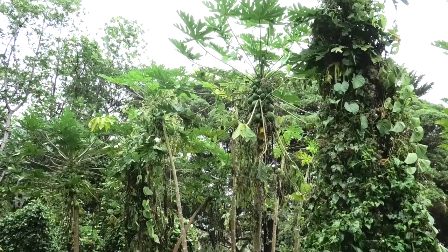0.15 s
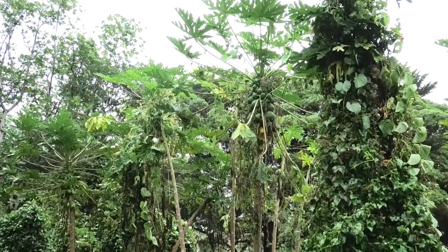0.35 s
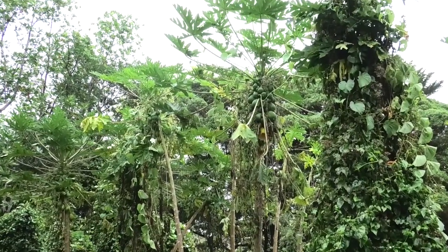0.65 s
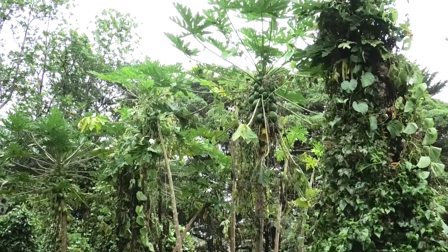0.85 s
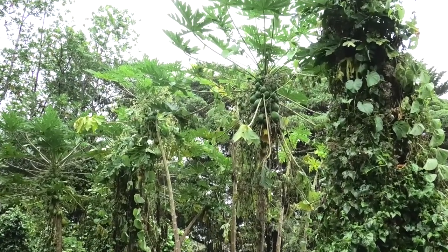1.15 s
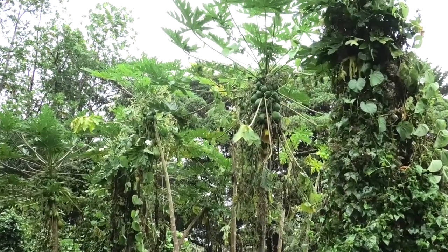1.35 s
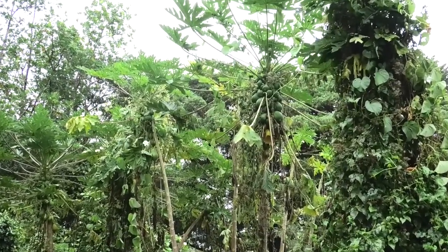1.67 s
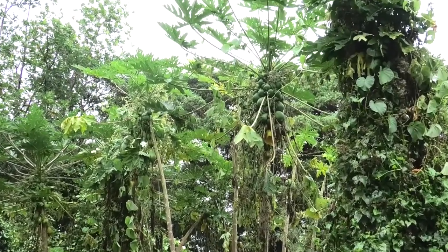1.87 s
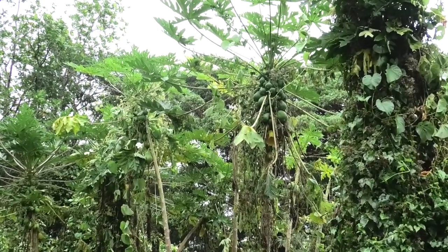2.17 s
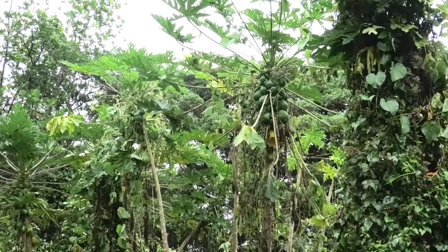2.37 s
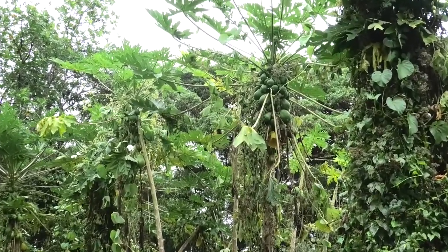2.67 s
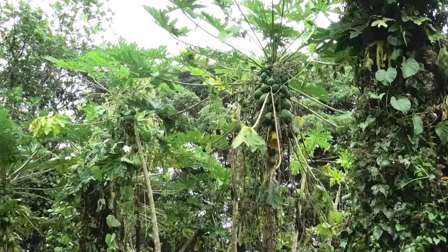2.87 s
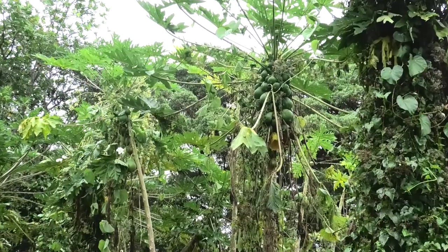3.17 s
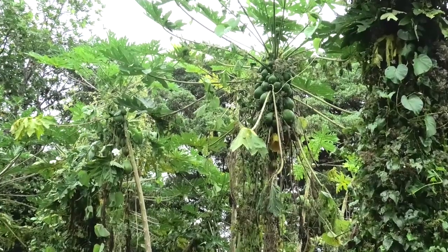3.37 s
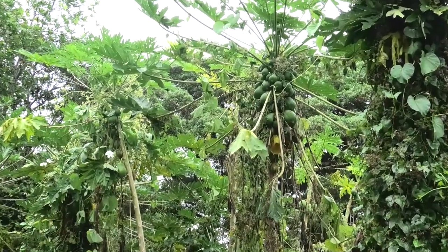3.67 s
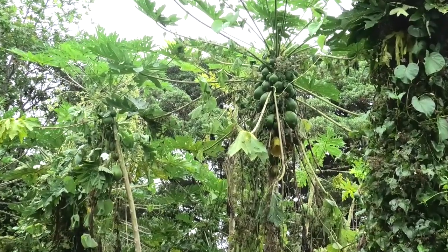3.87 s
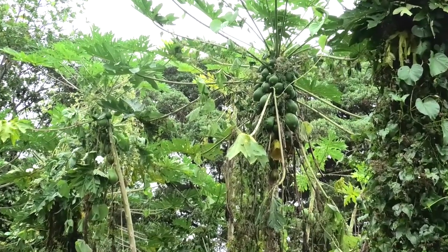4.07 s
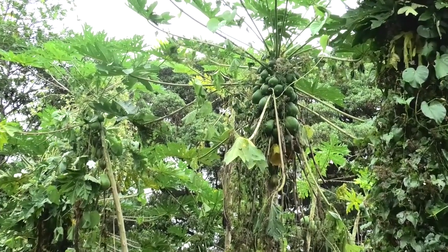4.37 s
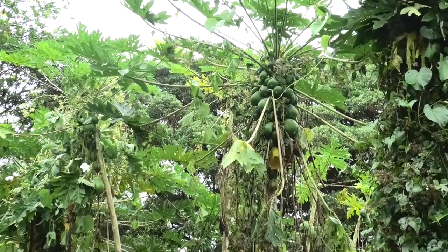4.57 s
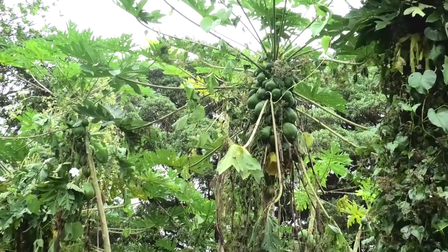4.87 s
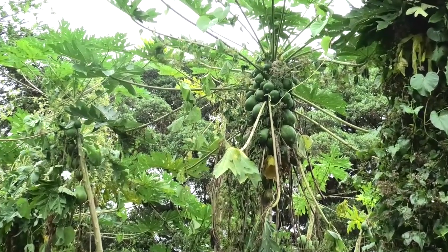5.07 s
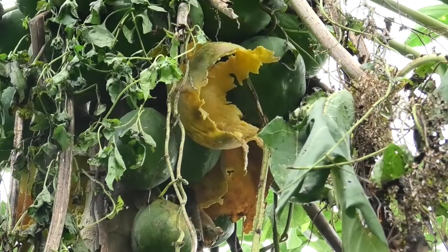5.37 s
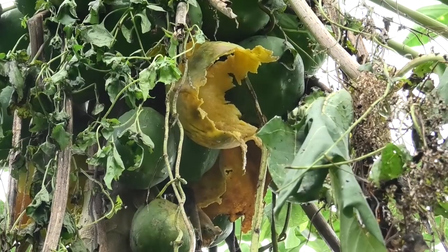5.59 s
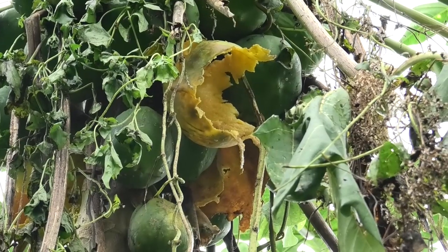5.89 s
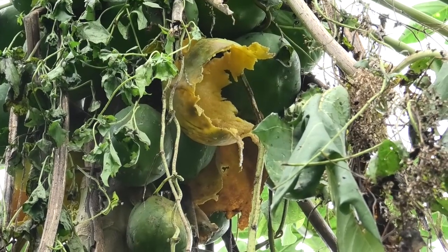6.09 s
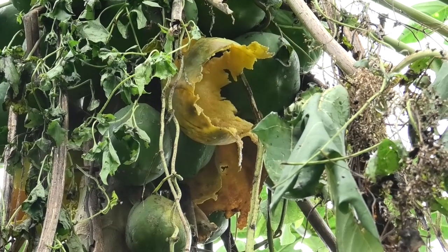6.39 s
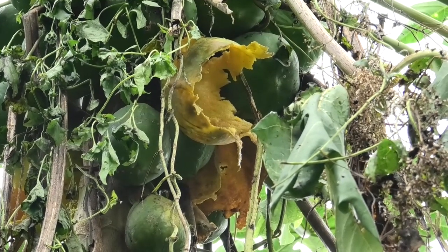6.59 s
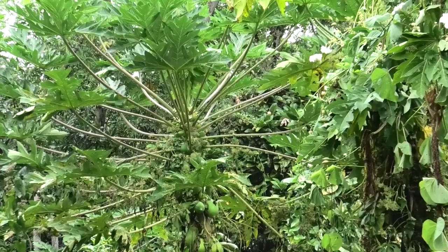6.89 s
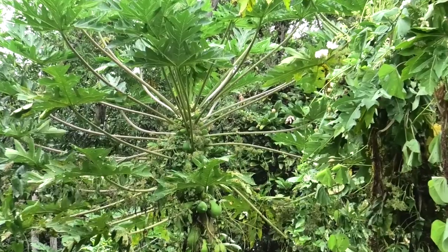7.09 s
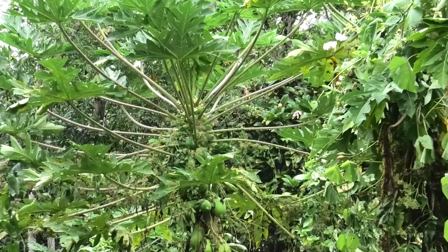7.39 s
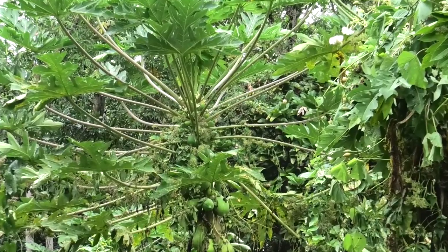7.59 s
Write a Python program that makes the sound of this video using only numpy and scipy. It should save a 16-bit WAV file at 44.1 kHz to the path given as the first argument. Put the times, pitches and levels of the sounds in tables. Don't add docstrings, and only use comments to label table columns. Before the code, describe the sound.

Outdoors among leafy trees, a whistle's tail opens the scene, then a loud close falling chirp at one second starts a loose exchange of near and distant birds. Later a crisp tick leads into rapid chattering, a softer two-bird overlap and a final clear whistle. Leaves rustle faintly; deep slow gusts press on the microphone over a steady dull hum.

```python
import sys
import numpy as np
from scipy import signal
from scipy.fft import rfft, irfft, next_fast_len
from scipy.io import wavfile
from scipy.ndimage import uniform_filter1d, map_coordinates

SR = 44100
rng = np.random.default_rng(int(sys.argv[2]) if len(sys.argv) > 2 else 0)


def gain_from_decibels(decibels):
    exponent = np.asarray(decibels, float) / 20
    return 10 ** exponent


def pcm_store(signal):
    levels = np.round(np.clip(np.atleast_2d(signal), -1, 1) * 32767)
    wavfile.write(sys.argv[1], SR, levels.astype(np.int16).T)


N = 341334


def unit(x):
    return x / np.sqrt(np.mean(x ** 2) + 1e-20)


def curves(rows, t):
    s, *columns = np.transpose(rows)
    return [np.interp(t, s, column) for column in columns]


def wobble(rate, size):
    knots = rng.standard_normal(int(size * rate / SR) + 4)
    return map_coordinates(knots, [np.arange(size) * rate / SR])


def coloured(x, spectrum):
    m = next_fast_len(N + 8192)
    hz, db = np.transpose(spectrum)
    bins_hz = np.fft.rfftfreq(m, 1 / SR)
    gain = gain_from_decibels(np.interp(np.log(bins_hz + 1), np.log(hz + 1), db))
    return unit(irfft(rfft(x, m) * gain, m)[:N])


def add(out, s, x):
    first = round(s * SR)
    x = x[max(-first, 0):]
    part = out[max(first, 0):][:len(x)]
    part += x[:len(part)]


def whistle(rows, warble_hz, rate_hz, second_db, third_db, half_db=-38):
    t = np.arange(rows[0][0], rows[-1][0], 1 / SR)
    hz, db = curves(rows, t)
    age = t - t[np.argmax(hz[:SR // 32])]
    turns = rate_hz * (age + 3 * age ** 2)
    fade = np.exp(-np.abs(age) / .12) * np.clip((t - t[0]) / .018, 0, 1)
    warble = np.cos(2 * np.pi * turns) * fade
    hz = uniform_filter1d(hz, size=70) + warble_hz * warble + 55 * wobble(260, size=len(t))
    phase = 2 * np.pi * np.cumsum(hz) / SR
    low = (4400 - hz) / 1000
    opening = np.clip(low, 0, 1) * (age < 0)
    tone = np.sin(phase)
    tone += gain_from_decibels(second_db + 10 * low + 11 * opening) * np.sin(2 * phase)
    tone += gain_from_decibels(third_db + 2 * low) * np.sin(3 * phase)
    tone += gain_from_decibels(third_db - 5 + 9 * low) * np.sin(4 * phase) * (4 * hz < SR / 2)
    tone += gain_from_decibels(half_db) * (np.sin(phase / 2) + np.sin(3 * phase / 2))
    edges = np.clip(np.minimum((t - t[0]) / .005, (t[-1] - t) / .004), 0, 1)
    buzz_db = 2.1 * wobble(153, size=len(t))
    return np.sqrt(2) * gain_from_decibels(db + buzz_db) * edges * tone


def foliage(x, echo_db, far_db=-15):
    t = np.arange(SR * 3 // 4) / SR
    glints = gain_from_decibels(8.9 * rng.standard_normal(len(t)))
    near = glints * gain_from_decibels(-60 * t / .11) * rng.standard_normal(len(t))
    far = gain_from_decibels(-60 * t / .55) * (1 - np.exp(-t / .02)) * rng.standard_normal(len(t))
    far = uniform_filter1d(far, size=3)
    scatter = near / np.linalg.norm(near) + gain_from_decibels(far_db) * far / np.linalg.norm(far)
    answer = gain_from_decibels(echo_db) * scatter
    answer[0] = 1
    return signal.fftconvolve(x, answer) / np.hypot(1, gain_from_decibels(echo_db))


def full_call(s, length, high_hz, low_hz, db, contour):
    upstroke_s, settle_s, droop_s = .022, .011, .014
    creep, swell = .4, .49
    bow_hz = 50
    share, overshoot_hz, droop_hz, open_db, top_db, end_db, place = contour
    settled, sag = upstroke_s + settle_s, length - droop_s
    peak = np.clip(place * length, settled + .001, sag - .001)
    peak_hz = np.interp(peak, [settled, sag], [high_hz, low_hz]) - bow_hz
    half_hz = (share + creep * (1 - share)) * high_hz
    half_db = db + open_db + swell * (top_db - open_db)
    return [(0, share * high_hz, db + open_db),
            (upstroke_s / 2, half_hz, half_db),
            (upstroke_s, high_hz + overshoot_hz, db + top_db),
            (settled, high_hz, db + top_db / 2),
            (peak, peak_hz, db),
            (sag, low_hz, db + end_db),
            (length, low_hz - droop_hz, db + end_db)]


def full_whistles():
    # start_s, length_s, pitch_after_upstroke_hz, pitch_before_droop_hz, level_db
    flickers = [
        (0.463, .169, 4747, 3923, -26),
        (7.165, .125, 4840, 4080, -43),
    ]
    reeds = [
        (1.878, .125, 5150, 4250, -51),
        (4.326, .169, 4740, 3655, -36.5),
    ]
    warblers = [
        (1.027, 0.15, 4696, 3845, -21.5),
        (2.541, 0.16, 4565, 3760, -31),
        (3.339, .138, 4760, 4000, -41.5),
        (3.996, .152, 4650, 3854, -28),
    ]
    risers = [
        (1.759, .093, 4664, 4400, -31),
    ]
    sliders = [
        (4.814, 0.15, 4730, 3890, -39),
        (7.411, .175, 4750, 3747, -24.5),
    ]
    swellers = [
        (2.206, 0.14, 4720, 3897, -33),
    ]
    # opening_pitch_share, overshoot_hz, droop_hz, opening_db, top_db, ending_db, peak_place (0-1)
    contours = [
        (.62, 540, 230, -35, -9.5, -8, .42),
        (.65, 550, 67, -19, -7, -11, 0.52),
        (.6, 18, 280, -23, -6.5, -7.5, .3),
        (.62, 30, 400, -6.5, -5.5, -6, 0.64),
        (.58, 86, 120, -16.5, -13, -9, .35),
        (.58, 790, 350, -16, -15, -5.5, .6),
    ]
    # depth_hz, rate_hz
    warbles = [(50, 38), (130, 37), (280, 31.5), (120, 45), (60, 50), (95, 50)]
    # second_db, third_db
    overtones = [(-30, -37), (-21, -34), (-28, -35), (-34.5, -31), (-28.5, -33.5), (-31, -37)]
    cover = [1, 7, -3, 2, 1, 4]
    out = np.zeros(N)
    kinds = flickers, reeds, warblers, risers, sliders, swellers
    for calls, contour, warble, (second_db, third_db), echo_db in zip(kinds, contours, warbles, overtones, cover):
        for call in calls:
            reedy_db = .54 * (-32 - call[-1])
            rows = full_call(*call, contour)
            tone = whistle(rows, *warble, second_db + reedy_db, third_db + reedy_db)
            add(out, call[0], foliage(tone, echo_db))
    return out


def duet():
    # start_s, pitch_hz, level_db
    voices = [
        [(6.57, 3690, -48), (6.58, 5250, -44), (6.588, 4500, -42), (6.602, 4680, -39), (6.625, 4430, -33),
         (6.645, 4180, -37), (6.657, 4200, -42)],
        [(6.652, 4200, -30), (6.662, 5200, -40), (6.675, 4500, -36), (6.7, 4180, -37.5), (6.73, 3990, -34),
         (6.752, 3650, -50)],
    ]
    out = np.zeros(N)
    for rows, second_db in zip(voices, (-26, -40)):
        tone = whistle(rows, 120, 47.9, second_db, -36)
        add(out, rows[0][0], foliage(tone, echo_db=0, far_db=-26))
    return out


def chatter():
    # start_s, pitch_hz, level_db
    phrases = [
        [(3.03, 3670, -53), (3.055, 4300, -49), (3.068, 4790, -40), (3.085, 4720, -53), (3.12, 4710, -53)],
        [(5.61, 4060, -44), (5.616, 5050, -50), (5.622, 4500, -39.5), (5.65, 4170, -43.5), (5.682, 3700, -41)],
        [(5.475, 3660, -35), (5.493, 5200, -42), (5.502, 4600, -36), (5.523, 4615, -35), (5.53, 5000, -41),
         (5.543, 3440, -39), (5.572, 4190, -38), (5.598, 3670, -40.5), (5.615, 3920, -36)],
        [(5.928, 2710, -48), (5.947, 5120, -49), (5.958, 3960, -43), (5.968, 3680, -46), (5.979, 4600, -58),
         (5.99, 3880, -44), (6.005, 3900, -51), (6.015, 4280, -52.5)],
    ]
    out = np.zeros(N)
    for rows in phrases:
        add(out, rows[0][0], foliage(whistle(rows, 0, 0, -36, -38), echo_db=-8))
    return out


def leftover():
    # start_s, pitch_hz, level_db
    ending = [
        (-0.12, 3080, -38),
        (-0.1, 4850, -29),
        (-0.05, 4465, -31.5),
        (0.014, 3630, -37),
        (0.028, 3240, -34),
    ]
    out = np.zeros(N)
    tone = whistle(ending, 99, 31.9, -18.5, -32)
    add(out, ending[0][0], foliage(tone, echo_db=2.5, far_db=-13.5))
    return out


def glides():
    # start_s, length_s, first_hz, last_hz, level_db
    slides = [(0.865, 0.12, 4590, 3950, -56), (1.458, .05, 4420, 3860, -53),
              (1.571, 0.028, 2960, 3330, -54), (1.612, 0.06, 4230, 3920, -50),
              (1.661, 0.027, 4130, 4130, -41.5), (2.174, .135, 4650, 3650, -45),
              (2.632, 0.11, 5330, 3900, -53), (2.81, .035, 3700, 3550, -53), (3.483, .03, 3920, 4290, -55),
              (3.493, .04, 5350, 4700, -58), (4.67, 0.11, 3710, 4170, -55.5),
              (5.161, 0.026, 4390, 4200, -44), (5.191, .055, 4220, 3720, -39),
              (5.256, 0.031, 3900, 3940, -42.5), (6.034, .09, 4410, 4030, -49),
              (6.262, .12, 4850, 3710, -53.5), (6.262, 0.095, 5550, 5200, -55),
              (6.43, 0.075, 4570, 4360, -49), (6.46, 0.04, 2900, 3740, -54), (6.8, .13, 4750, 3660, -50.5),
              (7.119, 0.08, 4750, 4220, -43.5), (7.43, 0.046, 2450, 2250, -52),
              (7.715, 0.033, 5830, 5100, -51)]
    out = np.zeros(N)
    for s, length, first_hz, last_hz, db in slides:
        edge_db = db - 3
        rows = [(0, first_hz, edge_db), (length / 2, (first_hz + last_hz) / 2, db), (length, last_hz, edge_db)]
        tone = whistle(rows, 130, 44.3, -32.5, -34)
        flutter = gain_from_decibels(3 * wobble(110, size=len(tone)))
        echo_db = 6 + .6 * (-46 - db)
        add(out, s, foliage(tone * unit(flutter), echo_db))
    return out


def pips():
    # peak_s, peak_db, pitch_hz
    notes = [(1.2794, -96, 6160), (1.6781, -59, 6000), (1.7888, -67, 6030), (1.8467, -60, 6100),
             (1.9194, -60, 6080), (1.9769, -67, 6100), (3.2231, -62, 6060), (3.6694, -65, 6030),
             (3.7599, -61, 6080), (3.8252, -65, 6100), (3.8851, -64, 6120), (5.1562, -63, 6130)]
    out = np.zeros(N)
    for s, db, hz in notes:
        rows = [(0, hz + 250, db - 5), (.012, hz + 60, db + 2), (.026, hz, db - .5), (.036, hz - 30, db - 12)]
        tone = whistle(rows, 0, 0, -60, -60, half_db=-60)
        add(out, s - .012, foliage(tone, echo_db=0))
    return out


def ticks():
    # start_s, peak_db, centre_hz, width_hz, t60_s
    snaps = [(0.955, -28, 6200, 5400, 0.0093), (1.572, -36, 10000, 9000, .003),
             (1.512, -54, 11000, 4000, .003), (1.205, -44, 11000, 5000, .01),
             (1.64, -46, 5470, 4000, 0.092), (1.89, -39, 9400, 3000, 0.0094),
             (2.398, -42, 11000, 7000, 0.0047), (2.433, -41, 11000, 7000, .006),
             (2.455, -46, 7000, 6000, 0.022), (2.768, -73, 12600, 5000, .004), (2.86, -47, 8000, 5970, .02),
             (5.234, -45, 10900, 8000, .003), (5.47, -22.5, 4940, 9500, .012),
             (5.478, -32, 7600, 14900, 0.22), (5.58, -45, 9000, 10000, 0.098),
             (5.81, -32, 7000, 4950, .005), (5.856, -36, 8000, 8000, .005), (6.125, -28, 2430, 2000, 0.014)]
    out, t = np.zeros(N), np.arange(SR // 8) / SR
    for s, db, hz, width_hz, t60 in snaps:
        limits_hz = [max(hz - width_hz / 2, 200), min(hz + width_hz / 2, 20000)]
        band = signal.butter(4, limits_hz, "band", fs=SR, output="sos")
        noise = unit(signal.sosfilt(band, rng.standard_normal(len(t))))
        burst = noise * gain_from_decibels(db - 5.5 - 60 * t / t60)
        add(out, s, foliage(burst, echo_db=-8))
    return out


def flock(level_db, count=220):
    out = np.zeros(N)
    for when, top, life, size in rng.random((count, 4)):
        hz, length = 4100 + 1300 * top, .091 + .076 * life
        rows = [(0, .58 * hz, -12), (.015, hz, -3), (length / 2, .9 * hz, 0), (length, .8 * hz, -8)]
        add(out, when * N / SR, gain_from_decibels(15 * size) * whistle(rows, 120, 47.3, -27, -32))
    return gain_from_decibels(level_db) * unit(foliage(out, echo_db=11, far_db=14)[:N])


def rustle(level_db):
    # pitch_hz, level_db per Hz
    leaf_colour = [(1000, -8), (2500, -11), (5000, 5), (8500, -1.5), (10000, -7), (15000, -18),
                   (16500, -38)]
    struck = rng.random(N) < 900 / SR
    grains = struck * gain_from_decibels(1.8 * rng.exponential(size=N)) * rng.standard_normal(N)
    clumps = gain_from_decibels(1.1 * wobble(14, size=N) + 1.1 * wobble(70, size=N))
    brushing = clumps * (rng.standard_normal(N) + 2.6 * grains)
    return gain_from_decibels(level_db) * coloured(brushing, leaf_colour)


def wind(t):
    # start_s, pressure_db
    gusts = [(0, -18), (.35, -26), (1.0, -19.5), (1.8, -21), (2.4, -21.5), (2.8, -19.5), (3.2, -16),
             (3.36, -27.5), (4.2, -19), (4.85, -18.5), (5.17, -27.5), (5.3, -18), (5.5, -27.5),
             (5.75, -16.5), (6.0, -16), (6.4, -20), (7.25, -15.5), (7.74, -23)]
    # pitch_hz, level_db per Hz
    pressure_colour = [(2, -9), (4, -8.5), (8, 9.5), (12, -2.5), (16, -2.5), (21, -8), (27, -9), (33, -17),
                       (40, -24), (60, -38), (120, -82.5)]
    gust_db = curves(gusts, t)[0] + 2.24 * wobble(3.92, size=N)
    return gain_from_decibels(gust_db) * coloured(rng.standard_normal(N), pressure_colour)


def far_hum(t):
    # start_s, level_db
    hum_level = [(0, -42.5), (2.8, -41), (4.3, -42.5), (5.5, -40.5), (6.3, -40.5), (7, -39.5), (7.74, -40)]
    # pitch_hz, level_db per Hz
    hum_colour = [(40, -61), (50, -15.5), (58, -16), (72, -13), (100, -22.5), (160, -17), (300, -19),
                  (950, -26.5), (3200, -39), (4600, -42.5), (8500, -54.5), (10000, -59), (15600, -65.5)]
    hum_db = curves(hum_level, t)[0] + .4 * wobble(5, size=N)
    return gain_from_decibels(hum_db) * coloured(rng.standard_normal(N), hum_colour)


def scene():
    # start_s, leaf_rustle_db, distant_flock_db
    grove = [(0, -72.5, -78), (.8, -72, -67), (1.16, -71, -54), (1.35, -72, -72), (1.65, -70.5, -55),
             (2.1, -68.5, -80), (2.78, -70.5, -80), (3.64, -72.5, -68), (4.31, -73, -62), (4.61, -77, -80),
             (5.24, -72, -60), (5.45, -58, -51), (5.67, -63.5, -54.5), (6.68, -67, -52), (6.96, -73, -68),
             (7.74, -68.5, -62)]
    t = np.arange(N) / SR
    rustle_db, flock_db = curves(grove, t)
    near_birds = full_whistles() + duet() + chatter() + leftover()
    hidden_birds = glides() + pips() + flock(flock_db)
    greenery = ticks() + rustle(rustle_db + 7.5)
    return (near_birds + hidden_birds + greenery + wind(t) + far_hum(t))[None]


def roll_off(x):
    return signal.sosfilt(signal.butter(12, 15720, fs=SR, output="sos"), x)


def record(dry):
    band_limit = signal.ellip(10, .5, 70, 15700, fs=SR, output="sos")
    mix = signal.sosfilt(band_limit, dry)
    return roll_off(mix)


dry = scene()
out = record(dry)
pcm_store(out)
```